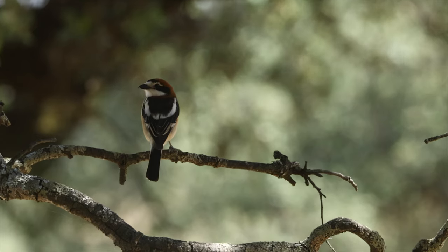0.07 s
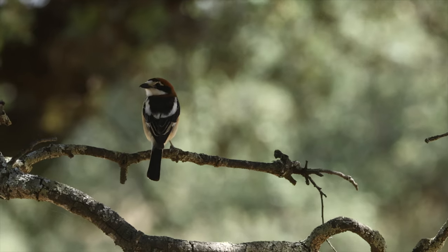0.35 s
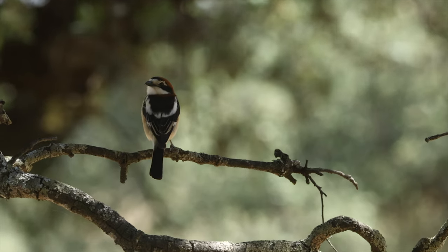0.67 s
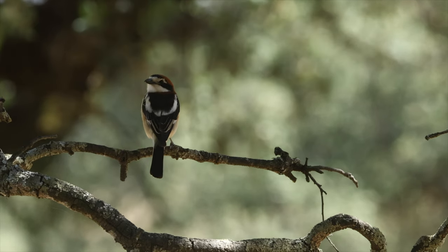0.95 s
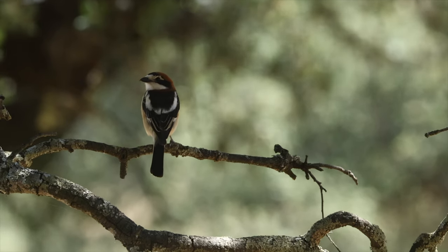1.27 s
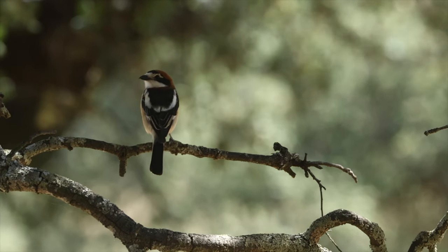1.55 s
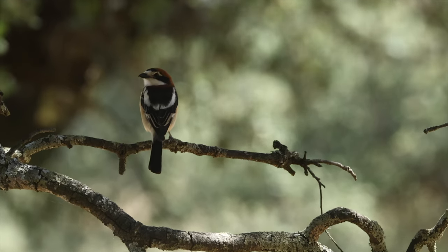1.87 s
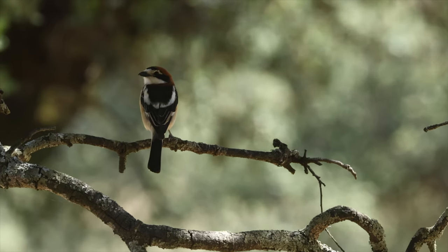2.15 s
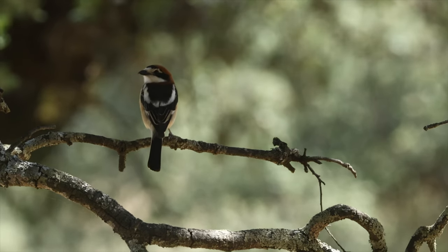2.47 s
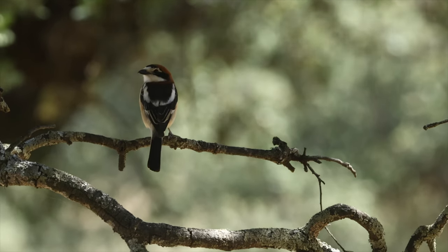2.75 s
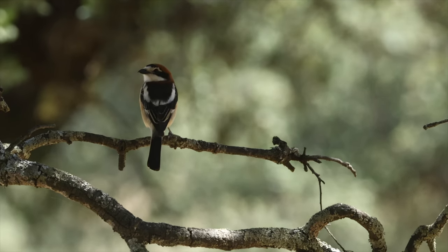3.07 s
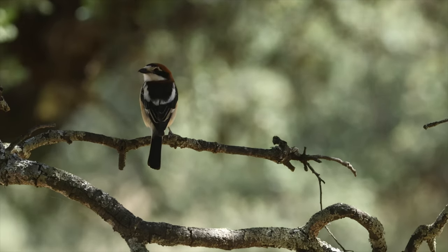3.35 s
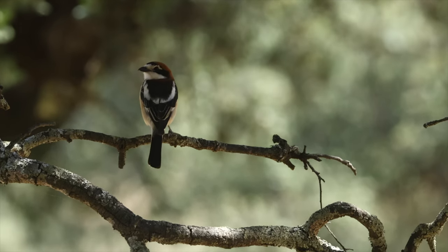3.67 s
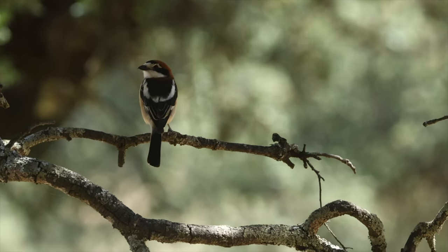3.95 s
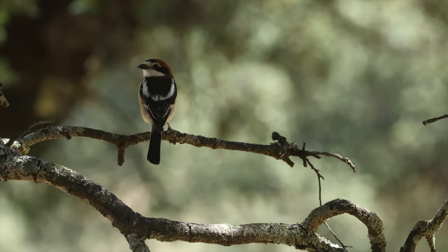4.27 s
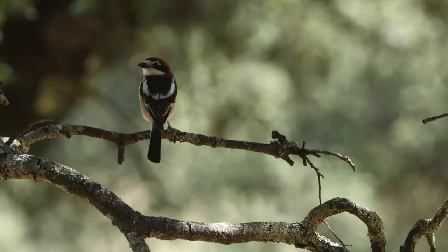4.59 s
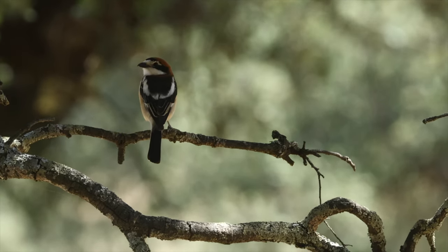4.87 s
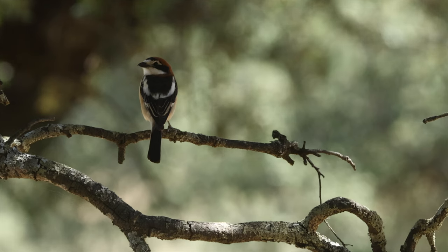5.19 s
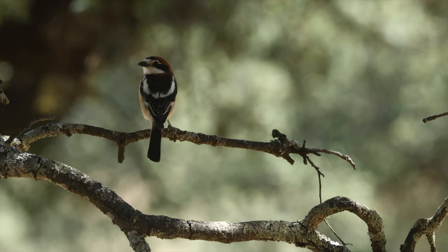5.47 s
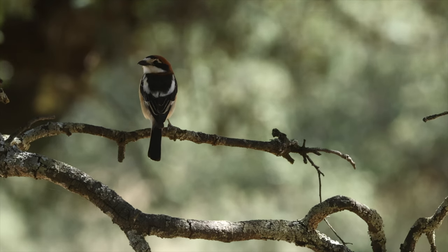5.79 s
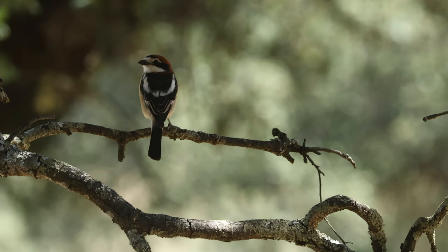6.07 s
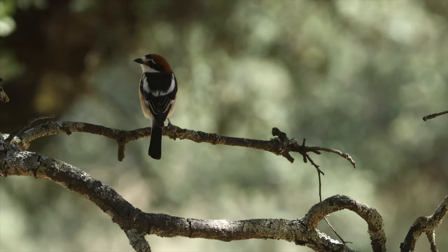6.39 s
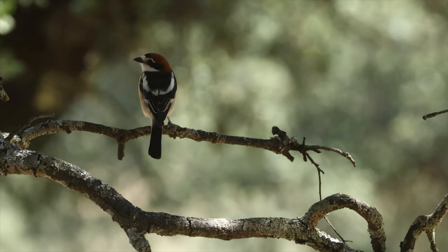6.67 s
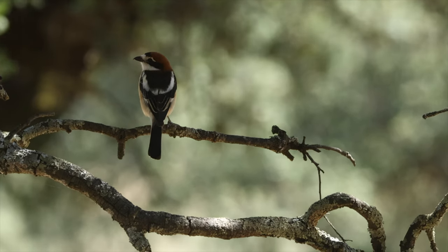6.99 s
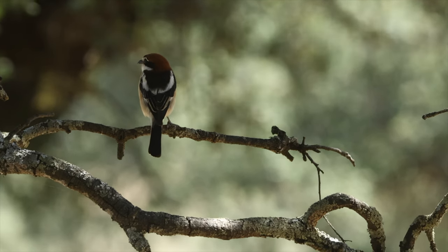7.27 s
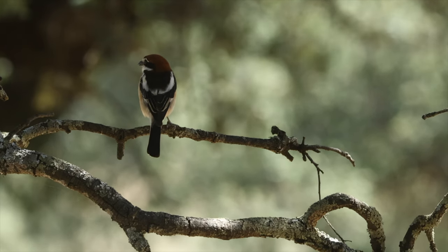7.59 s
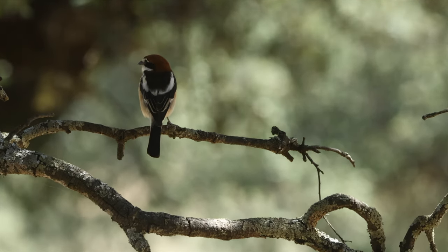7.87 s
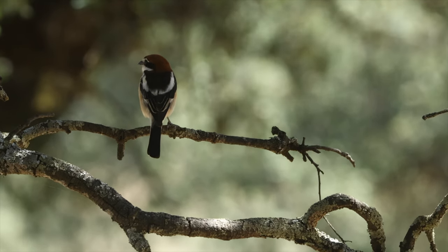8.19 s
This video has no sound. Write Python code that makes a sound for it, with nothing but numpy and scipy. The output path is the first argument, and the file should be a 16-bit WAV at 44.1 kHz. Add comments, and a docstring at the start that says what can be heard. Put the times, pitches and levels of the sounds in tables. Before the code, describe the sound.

Songbirds sing throughout in open woodland with a light echo. From about 0.4 to 1.5 seconds a near bird pours out quick, swinging warbles, while others overlap it with rising and falling whistles until about 2 seconds. Two birds give dry, rattling rasps, each about half a second or less: the higher at the start and near 0.7, 2.9 and 3.8 seconds, the lower near 2 and 3.8 seconds. Thin, high pips repeat from 2.5 to 4.8 seconds, and sharp rising chips recur until 7.5. Around 5 seconds a fast, shaking whistle stands out, with a faint, long falling whistle behind it. After a quieter stretch, short buzzes, harsh clacking calls and chirps build from about 6.5 seconds, with low fluty notes near 8. Tiny ticks, a blurred far chorus, soft hiss, a faint hum and a fading distant rumble sit behind the birds.

```python
"""A near warbler pours out swinging warbles over a dawn chorus in open woodland.
Two birds answer with dry, rattling rasps: slow pulses of the syrinx ringing in the throat.
Others whistle slurs, rises, chips, shakes, pips and ticks, all gliding near-sine tones, or scold
with breathy buzzes, chacks and snaps. Behind them a far chorus melts into the echo of the trees,
on a bed of soft hiss, distant rumble and faint hum."""
import sys
import numpy as np
from scipy import signal
from scipy.fft import rfft, irfft
from scipy.io import wavfile
from scipy.ndimage import uniform_filter1d, map_coordinates

SR = 44100
rng = np.random.default_rng(int(sys.argv[2]) if len(sys.argv) > 2 else 0)


def waveform_to_disk(signal):
    """Save audio, clipped to [-1, 1], as 16-bit WAV at the path in sys.argv[1]."""
    frames = np.transpose(np.atleast_2d(signal))
    scaled = np.clip(frames, -1, 1) * 32767
    samples = np.round(scaled).astype(np.int16)
    wavfile.write(sys.argv[1], SR, samples)


N = 372204
TIME = np.arange(N) / SR

# Colours of the noise beds. Each row: frequency in Hz, relative level in dB.
RUMBLE_COLOUR = [(45, -9), (200, -1.5), (500, -5.5), (1500, -14)]
HISS_COLOUR = [(50, 4), (650, 0), (4000, -18), (16000, -16.5)]
CHORUS_COLOUR = [(900, -13.5), (2200, -4.5), (5000, -5), (6000, -14), (8000, -26)]
# Fader ride of the far chorus. Each row: time in seconds, gain in dB.
CHORUS_RIDE = [(0, -33.5), (2.4, -37), (6.4, -38.5), (7.8, -36)]
# Level whistles deep in the wood. Each row: start and length in seconds, pitch in Hz, level in dB.
FAR_WHISTLES = [(7.64, 0.077, 3374, -38), (7.807, 0.052, 2697, -39)]
# A long whistle that sinks and fades. Each row: time in seconds, pitch in Hz, level in dB.
LONG_FALL = [(4.92, 3510, -43), (5.26, 2280, -45.5), (5.8, 1620, -52)]

# Cues for small repeated calls. Each entry: start in seconds.
PIP_CUES = [2.487, 2.733, 2.966, 3.103, 3.23, 3.451, 3.70, 3.956, 4.242, 4.76]
HIGH_BUZZ_CUES = [0.593, 7.35, 7.836, 8.34]
DOUBLE_SNAP_CUES = [2.583, 4.212, 5.31, 5.837, 5.961]
# Hoarse buzzes, and the ringing tail of one loud chack.
# Each row: start and length in seconds, centre and width in Hz, level in dB.
BUZZES_AND_CHACK_TAIL = [(0, 0.1, 5060, 450, -38), (0.146, 0.087, 2870, 646, -34),
                         (1.433, 0.096, 1180, 243, -43.5), (5.604, 0.44, 4300, 1540, -49.5),
                         (6.683, 0.14, 4430, 353, -42), (6.668, 0.23, 1590, 510, -47),
                         (7.226, 0.072, 5900, 656, -40.5)]
# Short calls, each kind of one shape. Each row: start in seconds, level in dB.
CHACKS = [(.51, -41.5), (1.52, -43), (4.939, -41.5), (5.244, -47), (6.609, -37), (7.469, -45), (7.895, -36),
          (8.289, -40.5)]
STEEP_CHIRPS = [(2.745, -42), (2.782, -46), (3.304, -41), (4.528, -44), (4.6, -45), (5.672, -43),
                (6.078, -47), (6.221, -43.5), (6.55, -40.5)]
SOFT_RISES = [(4.478, -40), (5.51, -42), (5.85, -47), (6.485, -40.5)]
# One bird's rising chips. Each row: start in seconds, top pitch in Hz, level in dB.
CHIPS = [(2.635, 5110, -36), (3.416, 5230, -36), (3.866, 5720, -38), (4.791, 5160, -40.5),
         (5.755, 5230, -40), (6.256, 5140, -35), (7.087, 5670, -34), (7.507, 5160, -35)]
# Whistled syllables. Each row: start and length in seconds, middle pitch in Hz, level in dB.
SLURS = [(0.423, 0.029, 3060, -29.5), (1.858, 0.075, 3210, -30), (7.815, 0.067, 3340, -37),
         (8.013, 0.062, 3380, -36), (8.354, 0.043, 2590, -36)]  # falling ever faster
SAGS = [(0.684, 0.043, 2726, -29.5), (1.492, 0.059, 2153, -35), (1.619, 0.085, 2650, -34.5),
        (1.764, 0.049, 3740, -29), (1.964, .11, 5640, -42.5), (4.22, 0.22, 2025, -43),
        (6.391, 0.15, 5600, -44), (7.121, 0.047, 3410, -40)]  # falling and levelling off
RISES = [(0.754, 0.072, 2620, -31), (0.891, 0.11, 3567, -24.5), (1.204, 0.0293, 3430, -26.5),
         (1.27, 0.037, 4440, -31), (1.988, .13, 2967, -31), (4.137, 0.084, 2296, -36),
         (4.588, 0.062, 2210, -37), (6.092, 0.071, 6700, -46), (6.834, 0.067, 6000, -48),
         (7.26, 0.039, 3350, -36.5), (8.165, 0.094, 3065, -33)]  # climbing to a plateau
FLICKS = [(1.669, .03, 3270, -35.5), (2.536, 0.17, 2117, -43.5), (6.31, .016, 6070, -40),
          (6.895, 0.022, 7000, -47)]  # whipping upward
SCOOPS = [(3.619, .2, 2049, -32.5)]  # dipping and climbing back
FLUTINGS = [(-.02, 0.061, 1602, -31), (0.118, 0.056, 1430, -39.5), (7.694, 0.067, 1466, -37.5),
            (7.944, .078, 1705, -28), (8.105, 0.057, 1476, -35.5)]  # low and drooping
# Their glides. Each holds: sweep in octaves and lift of both ends in octaves, for a 0.1 s syllable,
# then the power by which both grow with length.
SLUR_GLIDE, SAG_GLIDE, RISE_GLIDE = (-0.41, -0.095, 0), (-0.26, 0.057, 0.253), (0.291, -0.0624, 1)
FLICK_GLIDE, SCOOP_GLIDE = (0.86, 0.066, 0.25), (0.014, 0.15, 0)
DROOP_GLIDE, STEEP_GLIDE = (-0.611, -0.124, 0), (-0.62, 0.026, 0)
# Shaken whistles. Each row: start, length and entry time in seconds, swings per second,
# base pitch in Hz, level in dB.
SHAKES = [(4.865, 0.21, .043, 35, 2150, -33.5), (5.082, 0.123, .042, 36, 2140, -27)]

# Rattling rasps of two birds. Each row: start and length in seconds, level in dB.
LOW_RASPS = [(-.15, 0.55, -50), (1.99, 0.46, -37.5), (3.78, 0.48, -36.5)]
HIGH_RASPS = [(-.15, 0.33, -33), (.73, 0.35, -32), (2.87, 0.43, -32), (3.83, 0.39, -31.5)]
# Throat resonances of the raspers and the chack. Each row: centre and width in Hz, gain in dB.
LOW_THROAT = [(1095, 145, 6.5), (1465, 220, 1), (2160, 710, 0.5)]
HIGH_THROAT = [(1083, 290, -0.8), (2263, 950, 3), (2840, 850, -6.5)]
CHACK_THROAT = [(580, 165, 0), (1170, 830, -0.5), (1744, 255, 10.5), (2870, 600, -2.5)]
# The lead voice, one curve per warble. Each row of a curve: time in seconds, pitch in Hz, level in dB.
WARBLES = [
    [(.375, 4380, -39), (.418, 3550, -23), (.456, 3330, -32.5), (.476, 4510, -28.5), (.57, 2677, -27.5),
     (.596, 3160, -38)],
    [(.696, 3890, -36), (.724, 4160, -27), (.738, 4520, -28)],
    [(.74, 3640, -36), (.772, 3730, -32), (.836, 4680, -30.5), (.905, 3720, -26)],
    [(1.078, 4320, -35), (1.116, 3758, -24.5), (1.16, 3810, -24)],
    [(1.242, 2890, -29), (1.292, 3330, -36.5), (1.33, 4240, -27.5), (1.354, 3850, -30),
     (1.372, 2900, -30.5)],
    [(1.455, 2804, -31), (1.475, 2900, -30.5), (1.497, 2675, -26), (1.52, 3690, -31.5),
     (1.531, 4340, -22.5)],
]

WOOD_T60_S = 0.48


def from_db(db):
    """Decibels as a gain."""
    return 10 ** (np.asarray(db) / 20)


def rms_one(x):
    """Levels a sound to an RMS of one."""
    return x / np.sqrt(np.mean(x ** 2) + 1e-20)


def add(out, s, sound):
    """Mixes a sound in at s seconds."""
    i = int(s * SR)
    sound = sound[max(-i, 0):max(N - i, 0)]
    out[max(i, 0):max(i, 0) + len(sound)] += sound


def band(x, hz, width_hz, order=2):
    """A band-pass around hz."""
    low = np.hypot(hz, width_hz / 2) - width_hz / 2
    return signal.sosfilt(signal.butter(order, [low, low + width_hz], "band", fs=SR, output="sos"), x)


def drift(rate):
    """A random wobble of RMS one that turns about rate times a second."""
    return rms_one(np.interp(TIME * rate, np.arange(N // 16), rng.standard_normal(N // 16)))


def swell(u, edge, onset=1):
    """Fades in and out over the share edge of a call (u from 0 to 1); onset speeds up the attack."""
    return np.sin(np.pi / 2 * np.clip(np.minimum(u * onset, 1 - u) / edge, 0, 1))


def coloured(spectrum):
    """Steady noise with the given colour, rolled off beyond both ends."""
    hz, db = np.transpose(spectrum)
    f = np.arange(1, N // 2 + 2) * SR / N
    gain = from_db(np.interp(np.log(f), np.log(hz), db))
    roll_off = np.minimum(f / hz[0], 1) ** 2 * np.minimum(hz[-1] / f, 1) ** 2
    return rms_one(irfft(rfft(rng.standard_normal(N)) * gain * roll_off, N))


def whistle(hz, level):
    """The syrinx sings a sine that follows a pitch curve, at the given RMS level."""
    return np.sqrt(2) * level * np.sin(2 * np.pi * np.cumsum(hz) / SR)


def note(length, start_hz, middle_hz, end_hz, db, edge=0.37):
    """A whistle whose pitch bends through three points."""
    u = np.linspace(0, 1, max(int(length * SR), 2))
    bow = 2 * (2 * middle_hz - start_hz - end_hz)
    hz = start_hz + (end_hz - start_hz) * u + bow * u * (1 - u)
    return whistle(hz, from_db(db) * swell(u, edge))


def syllable(glide, length, hz, db):
    """A note shaped by a glide around its middle pitch."""
    sweep, bow, growth = glide
    octaves = (length / .1) ** growth * np.array([bow - sweep / 2, 0, bow + sweep / 2])
    return note(length, *hz * 2 ** octaves, db, edge=0.13)


def phrase(curve, round_s=0.0036):
    """An unbroken whistle along a drawn curve, its turns rounded."""
    s, hz, db = np.transpose(curve)
    t = np.arange(s[0], s[-1], 1 / SR)
    pitch = uniform_filter1d(np.interp(t, s, hz), int(round_s * SR), mode="nearest")
    level = from_db(np.interp(t, s, db)) * swell(np.linspace(0, 1, len(t)), edge=.04)
    return whistle(pitch, level)


def leaves(x, cut_hz=2970):
    """Foliage swallows the treble of sound that has come far."""
    return signal.sosfilt(signal.butter(2, cut_hz, fs=SR, output="sos"), x)


def wood(x, t60_s=WOOD_T60_S, predelay_s=0):
    """Trunks and leaves scatter sound into many faint echoes that die away."""
    t = TIME[:SR]
    echoes = rng.standard_normal(SR) * (rng.random(SR) < .03)
    echoes *= from_db(-60 * t / t60_s) * (t > predelay_s)
    return signal.fftconvolve(x, echoes / np.linalg.norm(echoes))[:N]


def air_bed():
    """A distant rumble that slowly fades, a faint hum and a steady hiss."""
    rumble = from_db(-50 - 2.84 * TIME) * coloured(RUMBLE_COLOUR)
    hum = from_db(-61.5) * rms_one(band(rng.standard_normal(N), hz=572, width_hz=81))
    hiss = from_db(-54) * coloured(HISS_COLOUR)
    return rumble + hum + hiss


def far_chorus(count=520, low_hz=2101, high_hz=5595, shortest_s=0.01375, longest_s=0.075, slide=0.3):
    """Hundreds of scattered notes, dulled by leaves, blur into their echo and a wash of noise."""
    notes = np.zeros(N)
    for when, pitch, span, first, last, distance in rng.random((count, 6)):
        hz = low_hz * (high_hz / low_hz) ** pitch
        length = shortest_s * (longest_s / shortest_s) ** span
        start_hz, end_hz = hz * np.exp(slide * (first - .5)), hz * np.exp(slide * (last - .5))
        add(notes, when * N / SR, note(length, start_hz, hz, end_hz, -10 * distance))
    twitter = from_db(-8.5) * rms_one(leaves(notes))
    tail = from_db(-1) * wood(twitter)
    wash = from_db(-8.5) * coloured(CHORUS_COLOUR)
    return (twitter + tail + wash) * from_db(np.interp(TIME, *np.transpose(CHORUS_RIDE)))


def far_singers(chatter_from_s=6.915, chatter_per_s=15, chatter_hz=2750):
    """Level whistles and late, loose chatter, half lost in their echo, plus one long, dry fall."""
    out = np.zeros(N)
    for s, length, hz, db in FAR_WHISTLES:
        add(out, s, note(length, hz, hz, hz, db, edge=0.094))
    for s in np.arange(chatter_from_s, N / SR, 1 / chatter_per_s):
        late, pitch, stretch = rng.uniform(-1, 1, 3)
        chirp = syllable(STEEP_GLIDE, .026 * (1 + stretch / 2), chatter_hz * 2 ** (.35 * pitch), db=-42)
        add(out, s + late / 2 / chatter_per_s, chirp)
    out += from_db(-1.5) * wood(out)
    add(out, LONG_FALL[0][0], phrase(LONG_FALL))
    return out


def tickers(per_s=9, tick_s=.007, centre_hz=4000):
    """Small birds tick near and far, each tick a very fast fall of an octave."""
    out = np.zeros(N)
    for when, pitch, distance in rng.random((int(per_s * N / SR), 3)):
        hz = centre_hz * 2 ** ((pitch - .5) / 2)
        tick = note(tick_s, hz * np.sqrt(2), hz, hz / np.sqrt(2), db=-40 - 10 * distance)
        add(out, when * N / SR, tick)
    return out


def pipper(hz=3830, fall=.008):
    """A thin, slightly falling pip of uneven strength and length, softened by a short leafy echo."""
    out = np.zeros(N)
    for s, (strength, stretch) in zip(PIP_CUES, rng.uniform(-1.1, 1, (len(PIP_CUES), 2))):
        length = .055 * 2 ** (stretch / 2)
        add(out, s, note(length, hz * (1 + fall), hz, hz * (1 - fall), db=-40 + 2.5 * strength))
    return out + .5 * wood(out, t60_s=.2, predelay_s=.03)


def hoarse(length, throat, db, fall=0, flutter_hz=190):
    """Breath, chopped by the fluttering syrinx, rings in the throat; pitch sinks by the share fall."""
    t = TIME[:int(length * SR)]
    breath = rng.standard_normal(len(t)) * (1 + 0.23 * np.sin(2 * np.pi * flutter_hz * t))
    voice = sum(from_db(gain_db) * band(breath, hz, width, order=3) for hz, width, gain_db in throat)
    bent = map_coordinates(voice, [SR * t * (1 + fall / 2 * (1 - t / length))])
    return from_db(db) * rms_one(bent * swell(t / length, 0.71, onset=5))


def scolders(snap_gap_s=.022):
    """Narrow buzzes, full-throated falling chacks (one with a ringing tail) and dry double snaps."""
    out = np.zeros(N)
    for s, length, hz, width_hz, db in BUZZES_AND_CHACK_TAIL:
        add(out, s, hoarse(length, [(hz, width_hz, 0)], db))
    for s in HIGH_BUZZ_CUES:
        add(out, s, hoarse(0.096, throat=[(6410, 350, 0)], db=-50.5))
    for s, db in CHACKS:
        add(out, s, hoarse(.075, CHACK_THROAT, db, fall=0.277))
    for s in DOUBLE_SNAP_CUES:
        for start in (s, s + snap_gap_s):
            add(out, start, hoarse(0.015, throat=[(4700, 1900, 0)], db=-41.5))
    return out


def shake(length, entry, rate, hz, db, swing=.2, scoop=0.1215, top_loss_db=22):
    """A whistle scoops up to pitch, then swings quickly, thinning at each sharp top."""
    t = TIME[:int(length * SR)]
    top = (1 - abs(np.sin(np.pi * rate * (t - entry)))) * (t > entry - .5 / rate)
    pitch = hz * (1 + swing * top - scoop * np.maximum(1 - t / entry, 0) ** 2)
    envelope = np.minimum(t / entry + 0.21, 1) * swell(t / length, 0.023)
    return whistle(pitch, from_db(db - top_loss_db * top ** 2) * envelope)


def whistlers(ring_hz=1080):
    """The supporting voices: gliding syllables, chips, shakes, steep chirps and soft, low rises."""
    out = np.zeros(N)
    for glide, rows in ((SLUR_GLIDE, SLURS), (SAG_GLIDE, SAGS), (RISE_GLIDE, RISES),
                        (FLICK_GLIDE, FLICKS), (DROOP_GLIDE, FLUTINGS), (SCOOP_GLIDE, SCOOPS)):
        for s, length, hz, db in rows:
            add(out, s, syllable(glide, length, hz, db))
    for s, length, _, _ in FLUTINGS:  # each fluting rings on as a soft echo near its last pitch
        add(out, s + length, note(0.099, ring_hz, ring_hz, ring_hz, db=-48))
    for s, hz, db in CHIPS:
        add(out, s, note(0.0568, hz * .89, hz * .985, hz, db, edge=0.2))
    for s, *shape in SHAKES:
        add(out, s, shake(*shape))
    for s, db in STEEP_CHIRPS:
        add(out, s, syllable(STEEP_GLIDE, length=.028, hz=2600, db=db))
    for s, db in SOFT_RISES:
        add(out, s, syllable(RISE_GLIDE, length=0.12, hz=2090, db=db))
    return out


def rasper(calls, throat, pulse_hz, breath, open_share, tone, tone_hz, tone_glide):
    """The syrinx snaps open in slow pulses; each lets out a puff and a scrap of tone, then shuts."""
    out, white = np.zeros(N), rng.standard_normal((len(calls), SR))
    for (s, length, db), air in zip(calls, white):
        u = np.linspace(0, 1, int(length * SR))
        slack = 0.22 * u ** 4  # the rattle slows, mostly at the very end
        turns = np.cumsum(pulse_hz * (1 - slack + 0.02426 * drift(pulse_hz)[:len(u)])) / SR
        cycle = turns % 1
        opening = swell(cycle / open_share, 0.1)
        snaps = rms_one(1. * (np.diff(cycle, prepend=0) < 0))
        source = snaps + breath * rms_one(air[:len(u)] * opening)
        voice = rms_one(sum(from_db(gain_db) * band(source, hz, width) for hz, width, gain_db in throat))
        pitch = tone_hz * (1 + tone_glide * (u - .5))
        pulse_phase = air[turns.astype(int)]  # each scrap starts at a random phase
        scraps = rms_one(opening * np.sin(2 * np.pi * pitch * cycle / pulse_hz + pulse_phase))
        add(out, s, from_db(db) * swell(u, 0.42) * rms_one(voice + tone * (1 - u) * scraps))
    return out


def waver(song, jitter_s=2.8e-5, flutter_db=2.46):
    """No bird holds pitch and strength quite steady."""
    return np.interp(TIME + jitter_s * drift(170), TIME, song) * from_db(flutter_db * drift(90))


def warbler(bounce_s=.0035, bounce_db=-6):
    """The lead: swinging whistles whose ground echo beats against the steep glides and roughens them."""
    out = np.zeros(N)
    for curve in WARBLES:
        s, warble = curve[0][0], phrase(curve)
        add(out, s, warble)
        add(out, s + bounce_s, from_db(bounce_db) * warble)
    return out


def scene():
    """Sets the near birds in the wood, over the far layers; one mix, panned slightly right."""
    songs = waver(warbler() + whistlers()) + scolders() + pipper() + tickers()
    rasps = rasper(LOW_RASPS, LOW_THROAT, pulse_hz=98.6, breath=0.12, open_share=0.32,
                   tone=0.14, tone_hz=1125, tone_glide=-0.046)
    rasps += rasper(HIGH_RASPS, HIGH_THROAT, pulse_hz=123.36, breath=1.5, open_share=0.562,
                    tone=1.63, tone_hz=2356, tone_glide=0.3)
    # nearby branches answer at once and make the glides flutter; the wood rings on
    branches = wood(from_db(-7.5) * songs + from_db(-9) * rasps, t60_s=0.06, predelay_s=.003)
    tail = from_db(-5.5) * wood(leaves(songs + from_db(-2.5) * rasps), predelay_s=0.017)
    backdrop = far_chorus() + air_bed() + far_singers()
    return (songs + rasps + branches + tail + backdrop) * from_db([[-1.45], [1.25]])


def record(dry, cutoff_hz=15800):
    """A steep low-pass trims the very top."""
    return signal.sosfilt(signal.ellip(10, .1, 70, cutoff_hz, fs=SR, output="sos"), dry)


dry = scene()
out = record(dry)
waveform_to_disk(out)
```